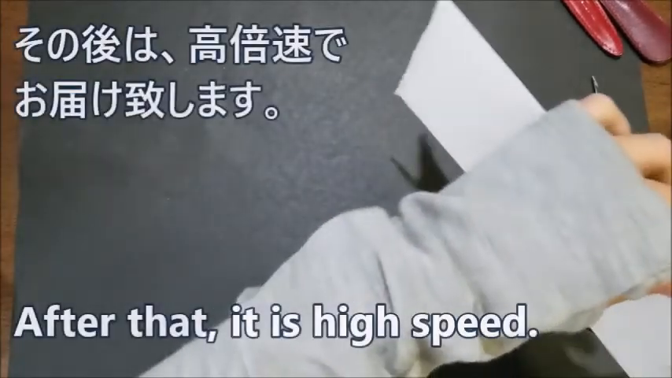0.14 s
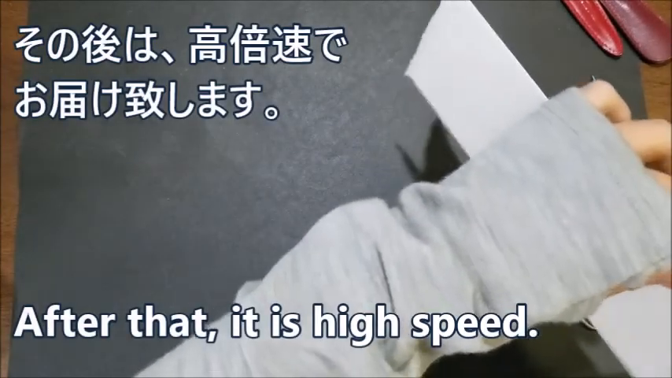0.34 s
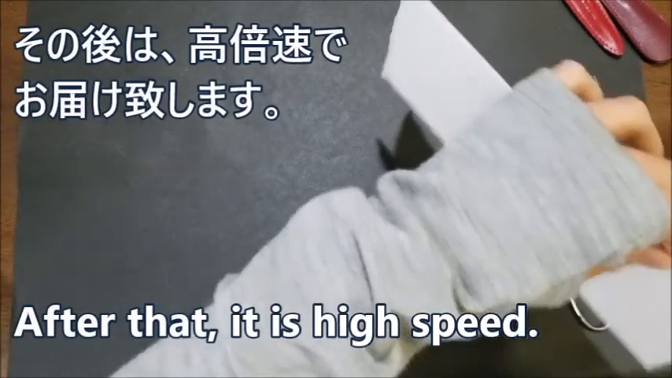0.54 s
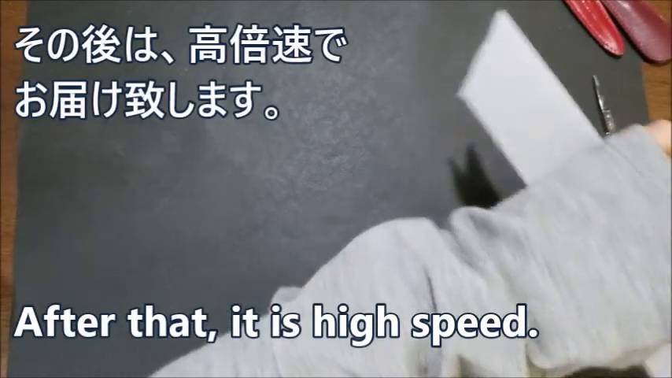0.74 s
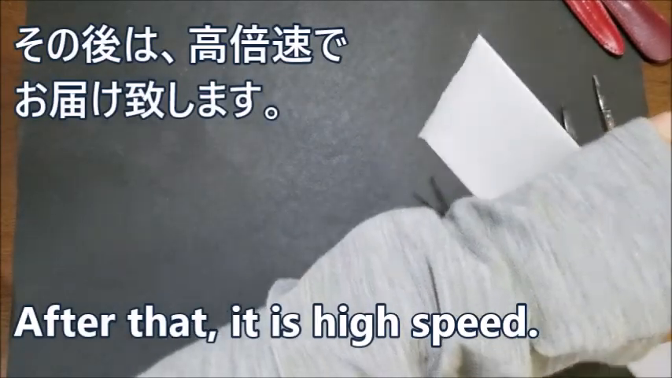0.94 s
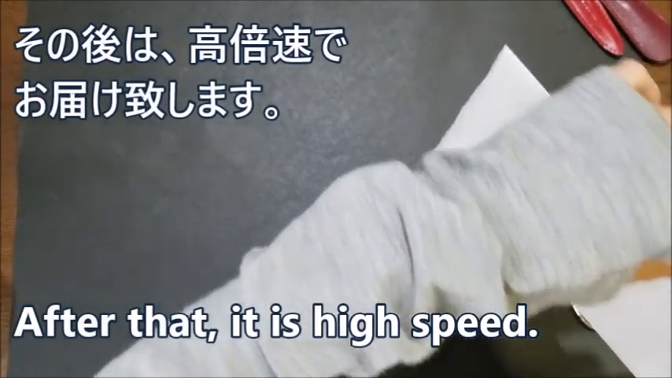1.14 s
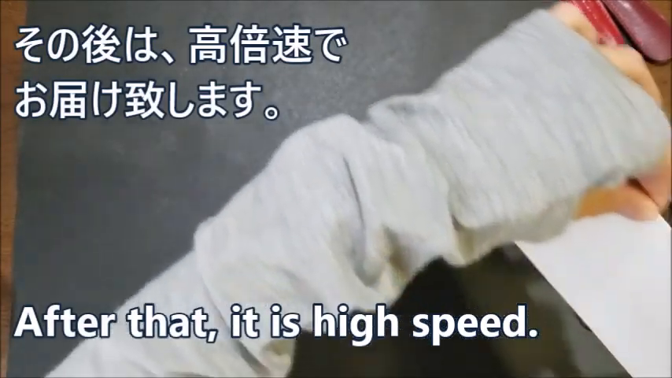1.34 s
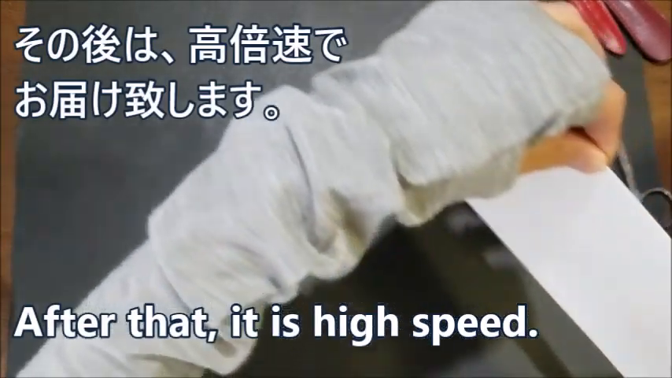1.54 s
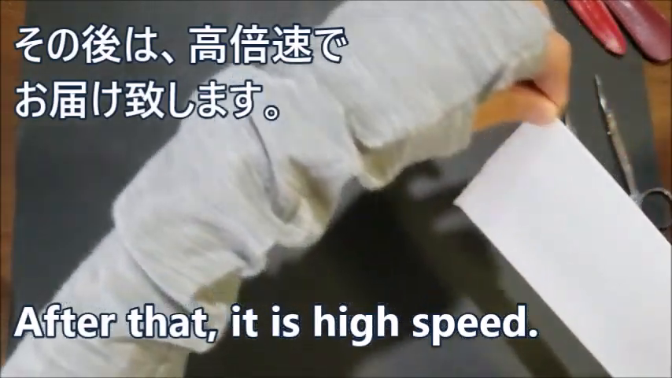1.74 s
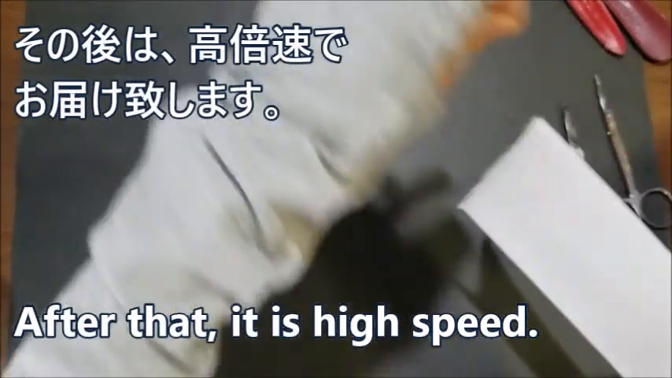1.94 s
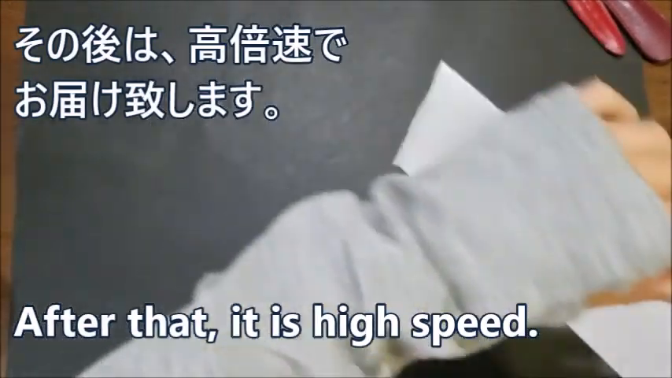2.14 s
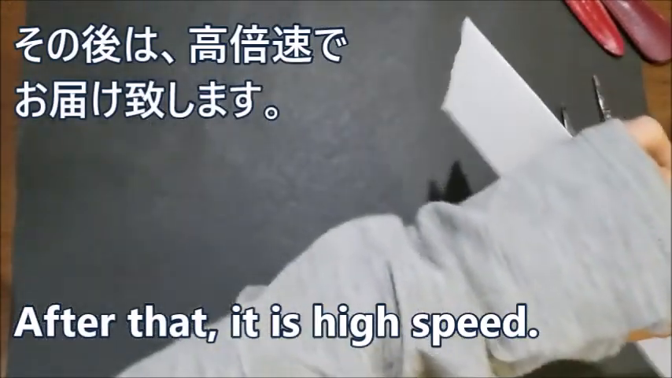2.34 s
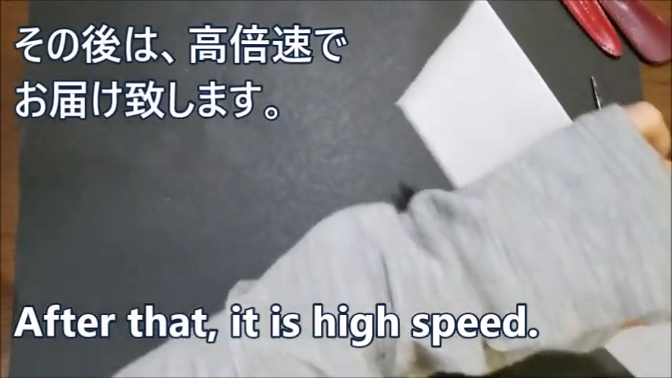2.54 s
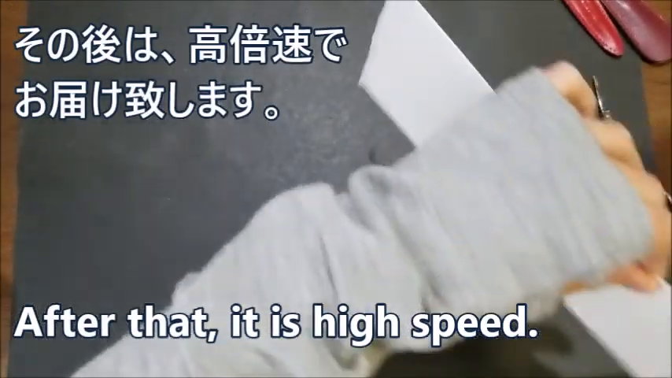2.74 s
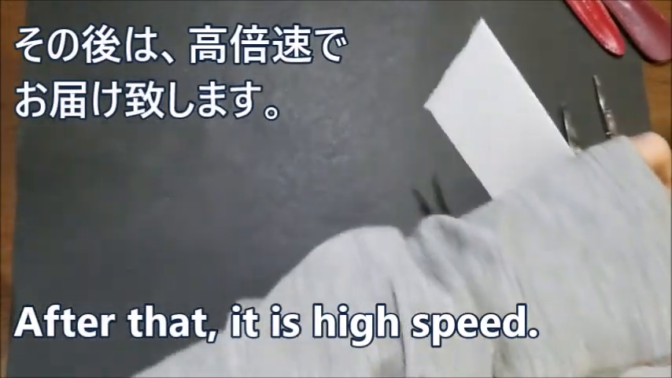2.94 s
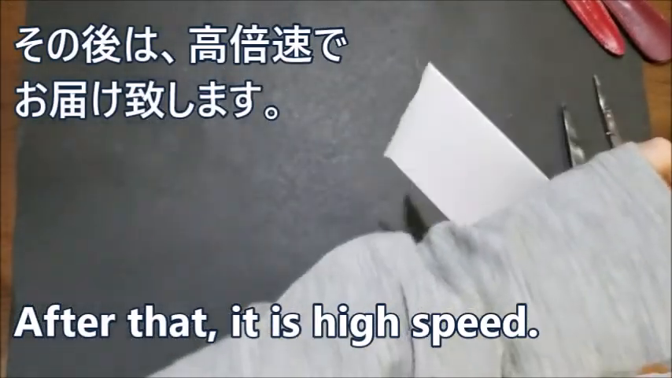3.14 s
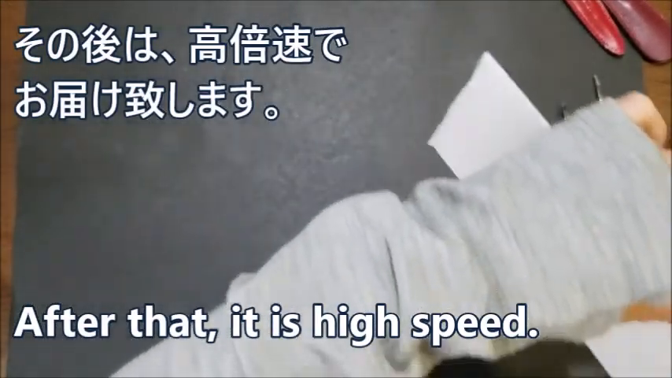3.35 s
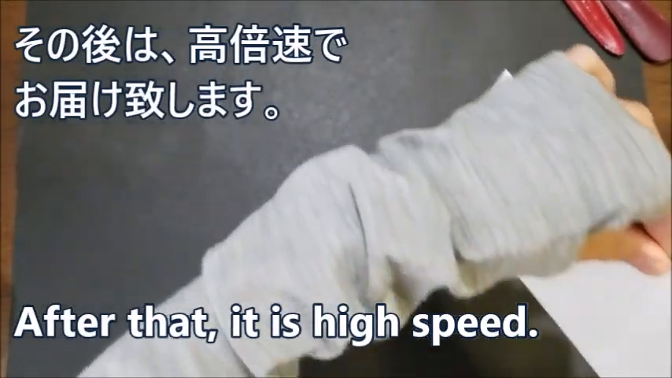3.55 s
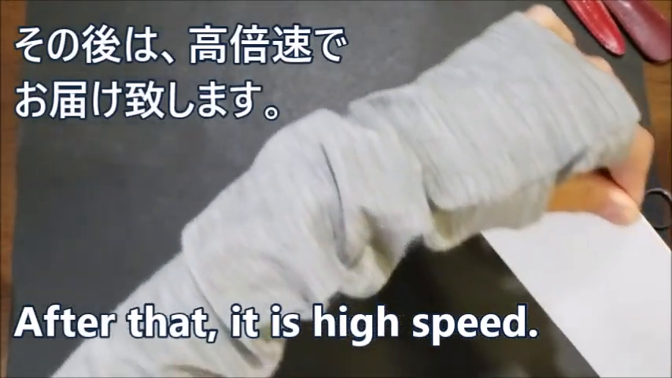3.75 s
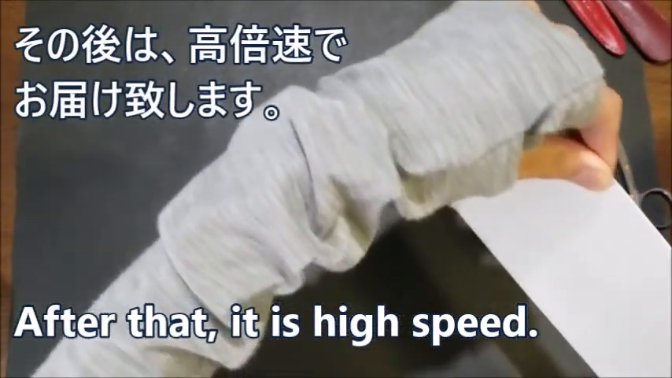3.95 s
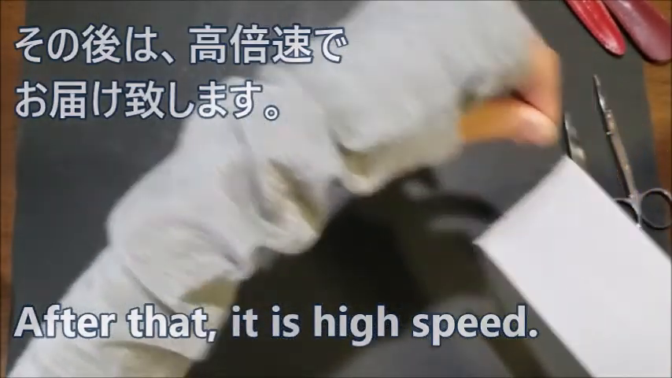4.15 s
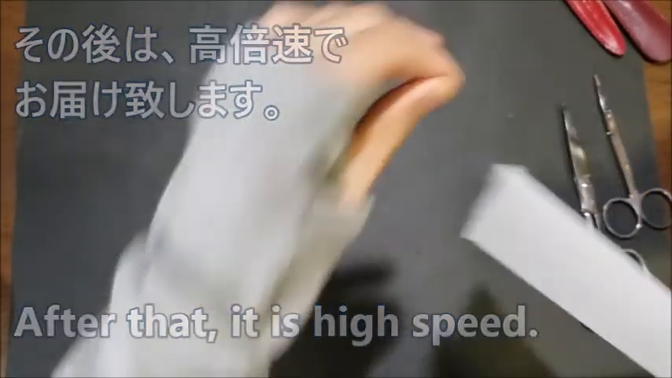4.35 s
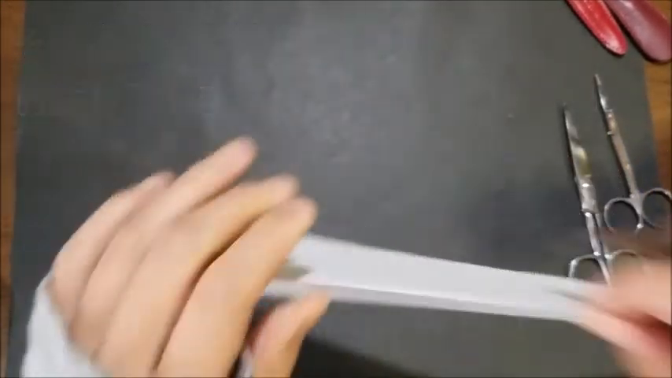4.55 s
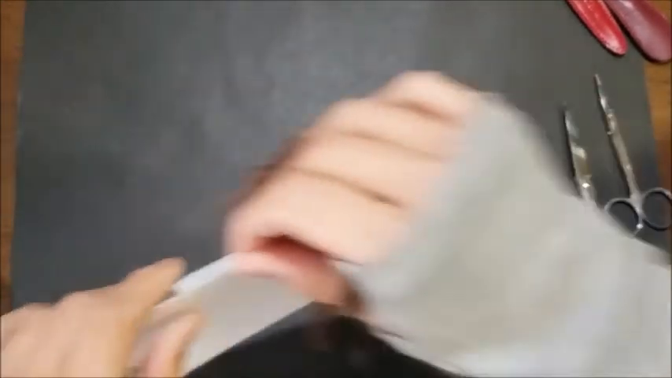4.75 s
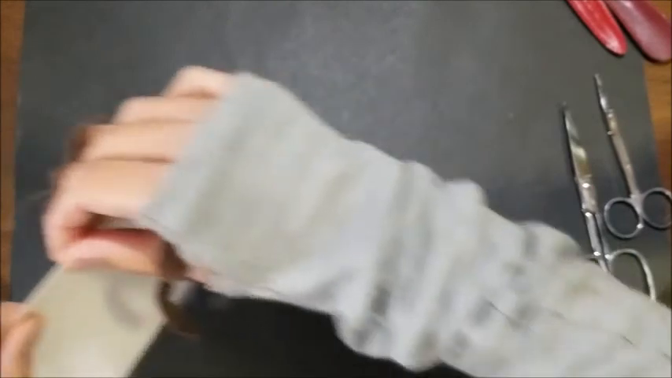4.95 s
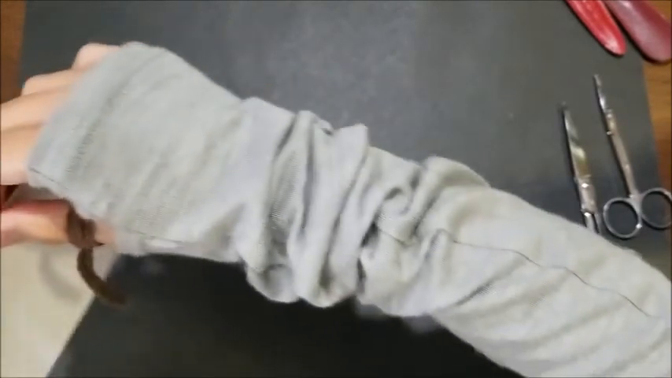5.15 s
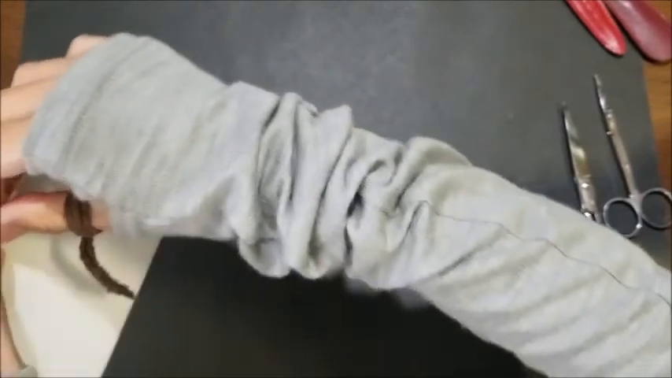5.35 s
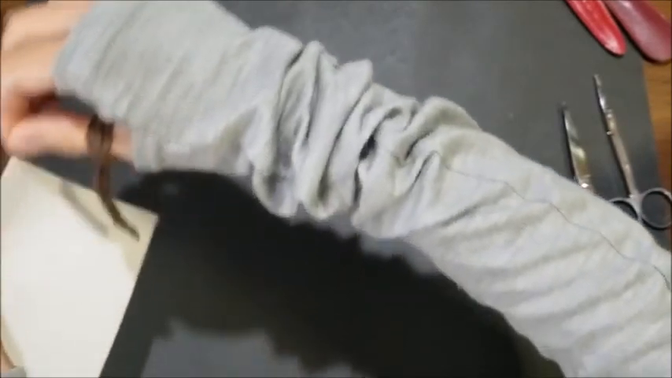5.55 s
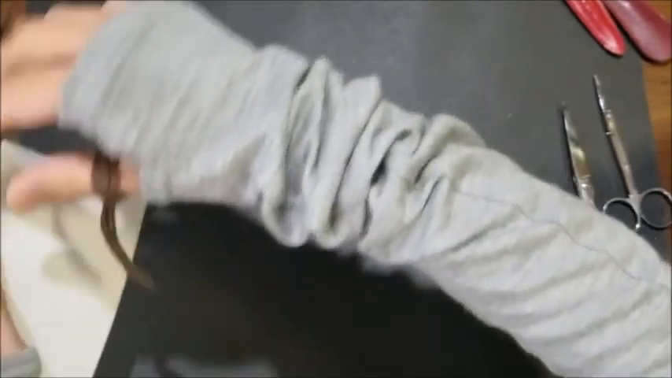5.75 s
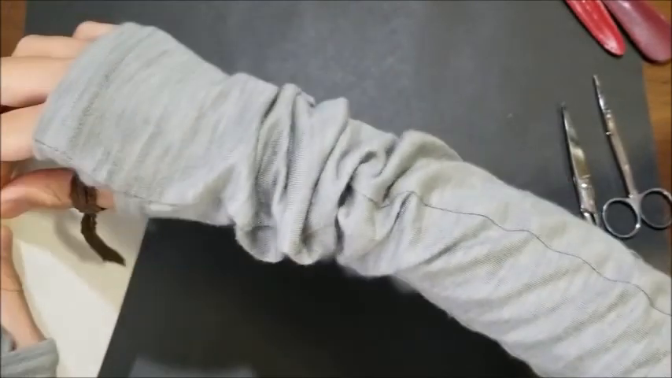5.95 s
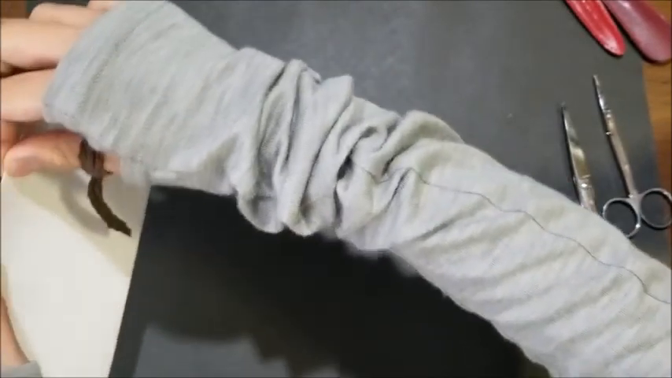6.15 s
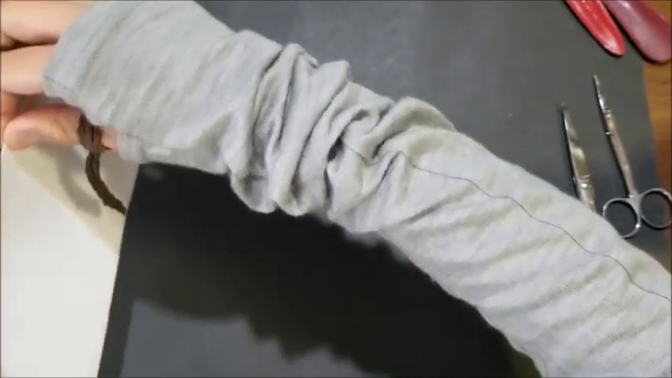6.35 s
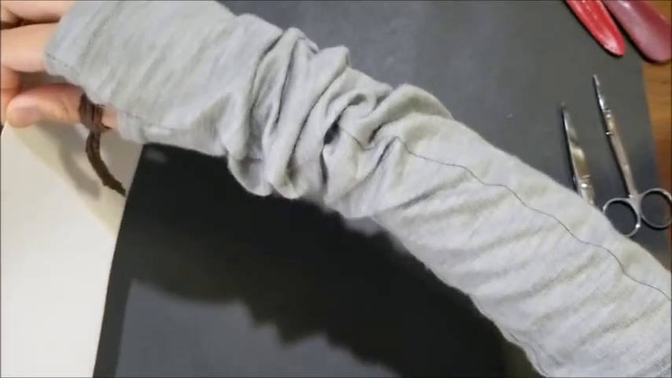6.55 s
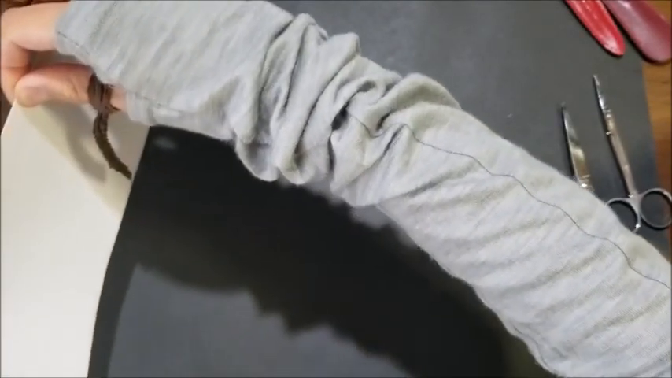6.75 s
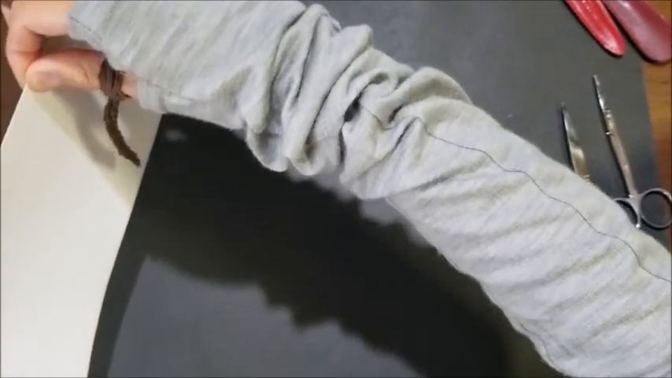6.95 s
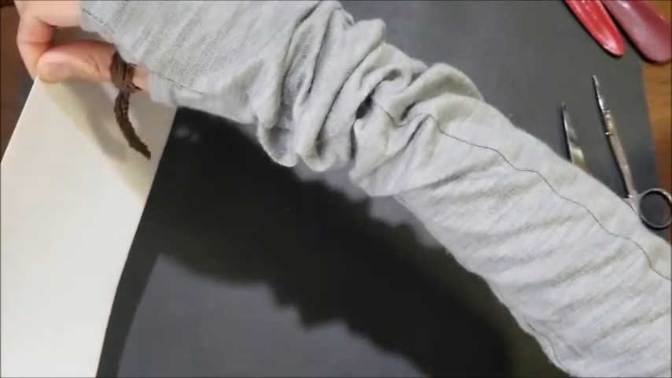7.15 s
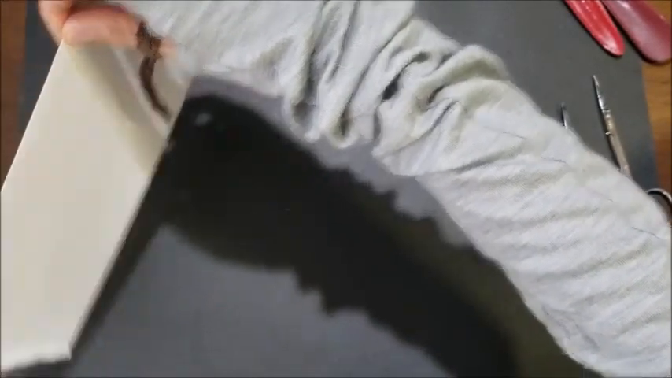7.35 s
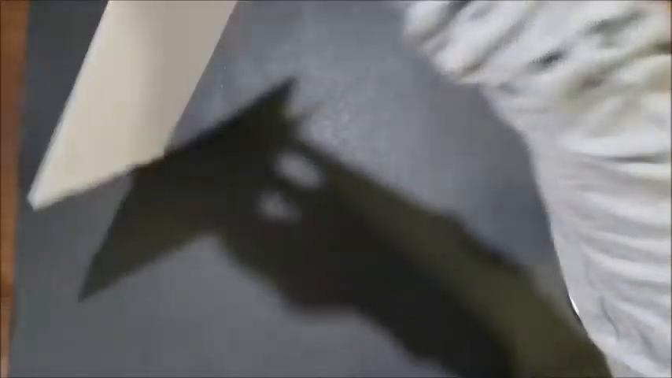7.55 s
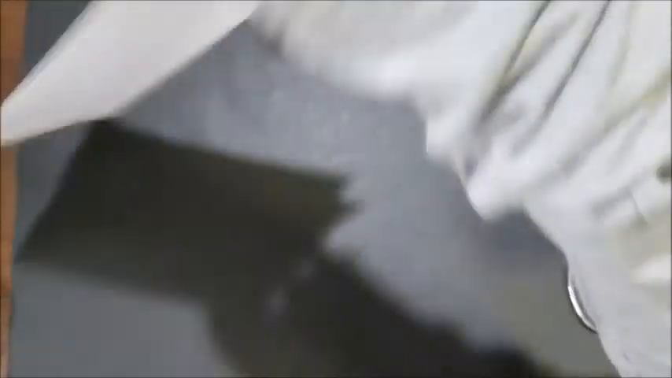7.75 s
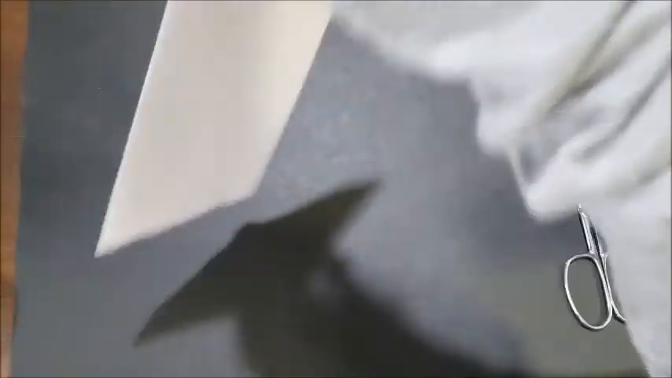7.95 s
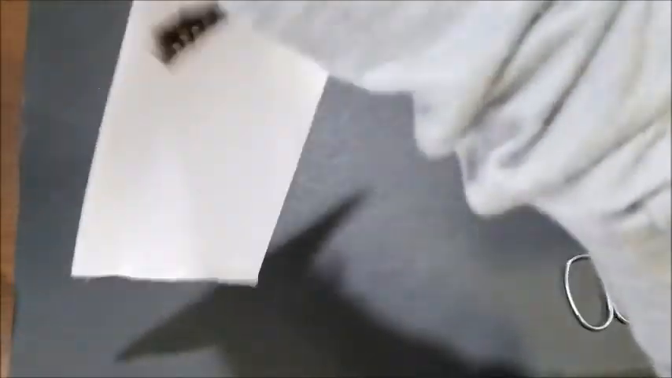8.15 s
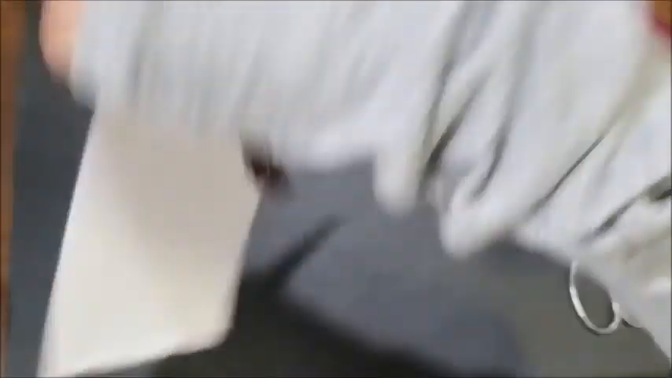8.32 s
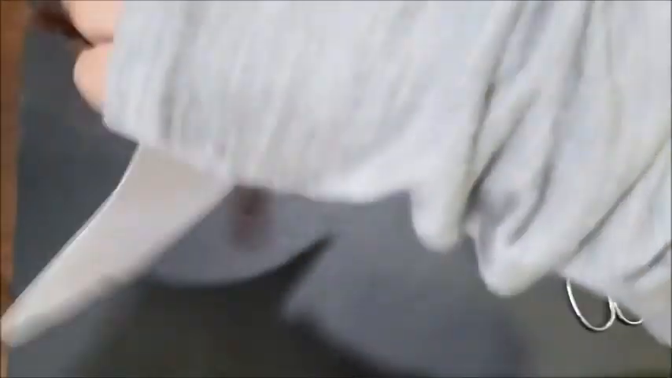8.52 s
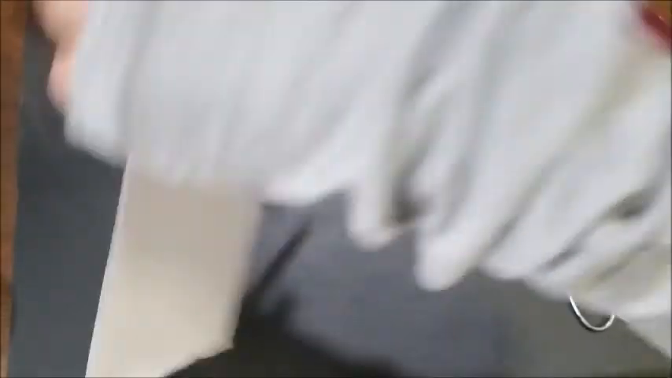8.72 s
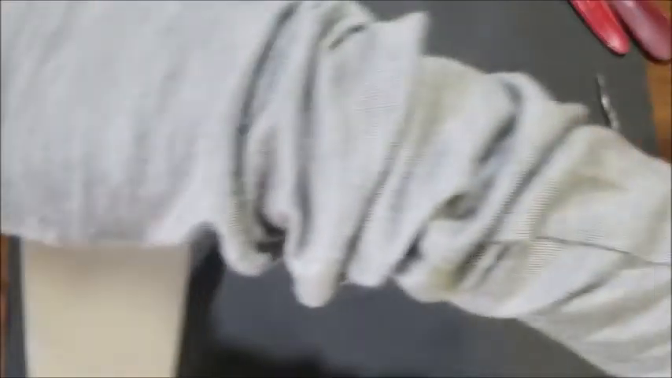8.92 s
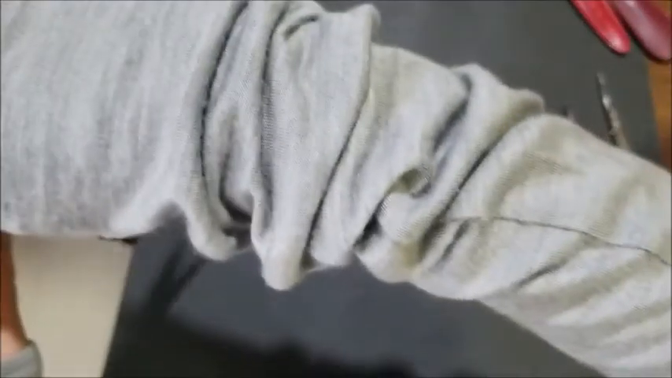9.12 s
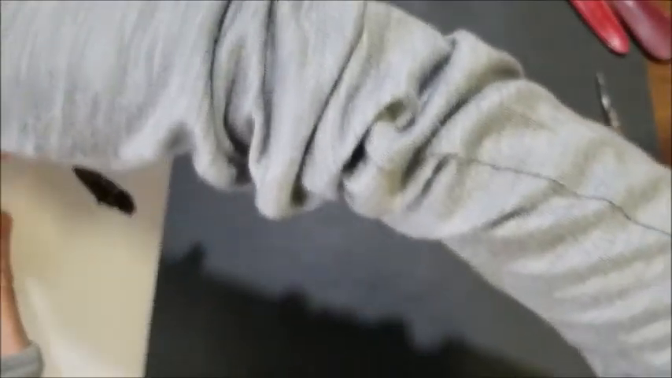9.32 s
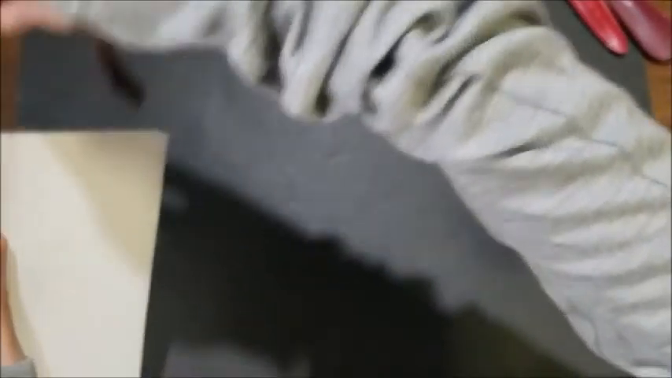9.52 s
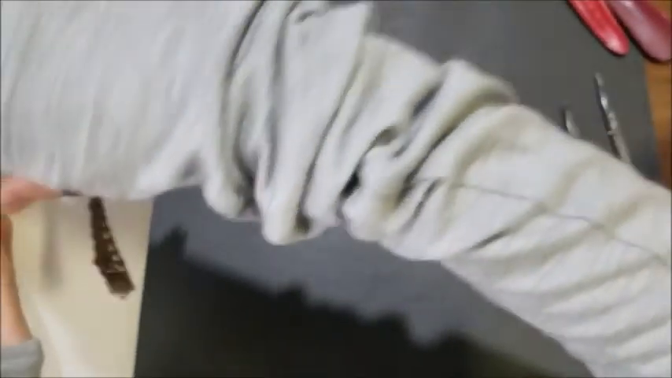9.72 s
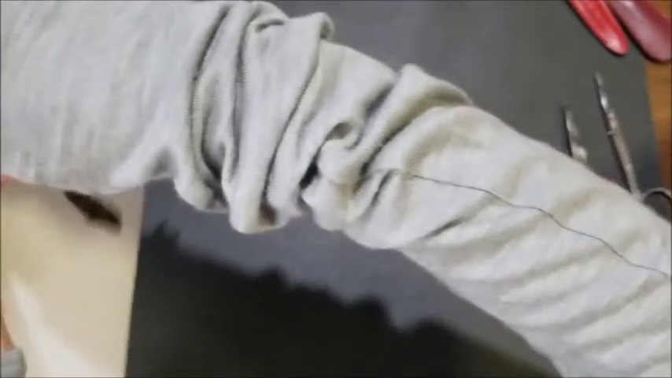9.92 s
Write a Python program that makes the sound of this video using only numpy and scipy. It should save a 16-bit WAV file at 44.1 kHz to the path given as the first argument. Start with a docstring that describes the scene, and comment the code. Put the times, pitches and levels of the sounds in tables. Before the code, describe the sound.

A quiet, dry room with faint steady hiss and a barely perceptible hum, heard closely in wide stereo with little bass. Light sleeve rustle leads to a quick paper swish on the right at 0.25-0.46 s. A long, uneven slide over the mat runs 1.0-1.8 s, ending in a rasping catch, chirp and soft thud. Short strokes come at 2.2 and 2.5 s, then brushing and another long glide from 3.2 to 4.16 s, again catching sharply. From 4.7 s light rustles shift left; a strong swish at 5.4 s precedes a softer, wavering slide at 6.0-7.3 s. At 7.8 s the sheet flaps with a thud and crack. Fluttering puffs and snaps follow at 8.3-8.7 s, with the crispest snap at 9.18 s. A short scrape ends in a pop at 9.47 s, then a brush and tiny final slide near 9.9 s.

```python
"""In a quiet room with faint hiss and hum, fingers and a cloth sleeve brush a sheet of paper: light friction.
It is slid over a desk mat, first on the right, then on the left: fibre slips hiss and shake edge, sheet and mat.
Each slide gathers speed, glides and stops; now and then the edge catches and rasps, or jerks free with a chirp.
The sheet flaps as puffs and sinking thuds, and late on it snaps as pulses with a short ring.
The whole sound is in stereo, with little bass and a deep gap around 4 kHz."""
import sys
import numpy as np
from scipy import signal
from scipy.fft import rfft, irfft, next_fast_len
from scipy.io import wavfile
from scipy.ndimage import map_coordinates

SR = 44100
rng = np.random.default_rng(int(sys.argv[2]) if len(sys.argv) > 2 else 0)


def transcribe(signal):
    """Save signal, clipped to [-1, 1], as a 16-bit WAV file at the path in sys.argv[1]."""
    frames = np.atleast_2d(signal).T
    limited = np.clip(frames, -1, 1)
    pcm = np.round(limited * 32767).astype(np.int16)
    wavfile.write(sys.argv[1], SR, pcm)


N = 440118

# Resonances of the paper edge. Each row: frequency in Hz, bandwidth in Hz, relative level in dB.
EDGE_MODES = [(5350, 700, -3), (6150, 900, 0), (6800, 800, -5)]


def from_db(db):
    """Decibels are logarithmic: 20 dB is a factor of ten in amplitude."""
    return 10 ** (np.asarray(db) / 20)


def rms_one(x):
    """Normalise the effective value (rms) of a signal to one."""
    return x / np.sqrt(np.mean(x ** 2) + 1e-20)


def colour(x, points):
    """Linear filtering: weight the spectrum by (Hz, dB) points joined along log frequency."""
    size = next_fast_len(x.shape[-1] + 4096)
    hz, db = np.transpose(points)
    bins = np.maximum(np.arange(size // 2 + 1) * SR / size, 1)
    gain = from_db(np.interp(np.log(bins), np.log(hz), db))
    return irfft(rfft(x, size) * gain, size)[..., :x.shape[-1]]


def band(x, low_hz, high_hz, order=2):
    """Band-pass filtering with the maximally flat Butterworth response."""
    edges = [low_hz, min(high_hz, .45 * SR)]
    return signal.sosfilt(signal.butter(order, edges, "band", fs=SR, output="sos"), x)


def resonate(x, modes):
    """Modal superposition: damped resonators in parallel, with alternating signs."""
    out = 0
    for k, (hz, width, db) in enumerate(modes):
        radius = np.exp(-np.pi * width / SR)
        zeros = np.array([1, 0, -1]) * (1 - radius * radius) / 2
        poles = [1, -2 * radius * np.cos(2 * np.pi * hz / SR), radius * radius]
        out = out + (-1) ** k * from_db(db) * signal.lfilter(zeros, poles, x)
    return out


def drift(size, rate):
    """Slow random modulation: normal values, `rate` of them a second, joined by lines."""
    knots = rng.standard_normal(int(size * rate / SR) + 2)
    return np.interp(np.arange(size) * rate / SR, np.arange(len(knots)), knots)


def sides(pan_db):
    """Intensity stereo: left and right gains for a level difference, at constant power."""
    gains = from_db(np.array([pan_db, -pan_db]) / 2)
    return gains / np.sqrt(np.mean(gains ** 2, axis=0))


def two_ears(size, on_left, alike, lag_s=0.000806):
    """Partial coherence: shared noise reaches the far microphone later, the rest is independent."""
    shared, own = rng.standard_normal(size), rng.standard_normal((2, size))
    share = min(abs(alike), 1)
    wander = 1 + .02 * drift(size, 3)  # the lag shifts as the hand moves
    far = map_coordinates(shared, [np.arange(size) - lag_s * SR * wander], order=3, mode="mirror")
    pair = np.array([shared, np.sign(alike) * far])  # negative alike: opposite phase
    near_first = pair[::1 if on_left else -1]
    return np.sqrt(share) * near_first + np.sqrt(1 - share) * own


def both_ports(x, pan_db, lag_s=.00075):
    """Dipole radiation: a flexing sheet reaches the far microphone later and in opposite phase."""
    return np.array([x, -np.roll(x, int(lag_s * SR))])[::1 if pan_db > 0 else -1]


def lay_out(sounds):
    """Superposition: sum (first sample, stereo sound) pairs on the time line."""
    out = np.zeros((2, N))
    for first, sound in sounds:
        out[:, first:first + sound.shape[1]] += sound[:, :N - first]
    return out


def quiet_room(air_db):
    """Stationary noise: steady air and microphone hiss, with a faint pure hum."""
    # Spectrum of the air and microphone hiss. Each row: frequency in Hz, relative level in dB.
    air_spectrum = [(25, -30), (55, -30), (80, -13), (120, -7), (200, -1.5), (350, -1.5), (700, 0),
                    (1200, -1.5), (2400, -4.5), (5000, -6.5), (9000, -8), (16000, -8.5)]
    hum_hz, hum_db = 119, -76
    hum = from_db(hum_db) * np.sin(2 * np.pi * hum_hz * np.arange(N) / SR)
    return from_db(air_db) * rms_one(colour(rng.standard_normal((2, N)), air_spectrum)) + hum


def touch(start, end, attack_s, release_s):
    """Contact envelope: linear attack, hold, exponential release; returned with its times."""
    first = max(int((start - attack_s / 2) * SR), 0)
    last = min(int((end + 6 * release_s) * SR), N)
    t = np.arange(first, last) / SR
    return t, np.clip((t - t[0]) / attack_s, 0, 1) * np.exp(-np.maximum(t - end, 0) / release_s)


def slips(size, per_s, spread_db, slip_s):
    """Stick-slip as a random point process: fibres catch and let go in dying bursts of force; rms 1."""
    strength = from_db(spread_db * np.clip(rng.standard_normal(size), -2, 2))
    releases = (rng.random(size) < per_s / SR) * strength
    return rms_one(signal.lfilter([1], [1, -np.exp(-1 / (slip_s * SR))], releases + 1e-9))


def desk_echo(x, delay_s, sway, strength):
    """Comb filtering: the contact moves, so its desk reflection changes delay and the colour sweeps."""
    n = np.arange(x.shape[1])
    delay = SR * delay_s * np.exp(sway * drift(len(n), 4.84))
    return x + strength * np.array([map_coordinates(side, [n - delay], order=3) for side in x])


def patches(x, patchy_db, per_s):
    """Changing modes: the sheet's free length varies under the hand, so treble bands swell and fade."""
    size = next_fast_len(x.shape[1])
    spectrum, hz = rfft(x, size), np.arange(size // 2 + 1) * SR / size
    centres = np.linspace(4000, 16000, 11)
    out = 0
    for share in np.eye(len(centres)):  # overlapping triangular bands
        part = irfft(spectrum * np.interp(hz, centres, share), size)[:, :x.shape[1]]
        out = out + part * from_db(patchy_db * drift(x.shape[1], per_s))
    return out


def friction(t, contact, hiss, rasp, body, rub, treble_pan, flutter_db, top_db, tilt_db):
    """Sliding friction: dense fibre slips hiss, and shake the edge, the sheet and the mat under it."""
    # Colour of the friction treble on either side of the desk.
    # Each row: frequency in Hz, relative level in dB.
    treble_left = [(2940, -11), (5000, 1.5), (5320, -1), (5650, -3.5), (6280, -6), (7060, -9.5),
                   (7580, -7.5), (7950, -8.5), (8820, -8), (9520, -7.5), (11200, -8.5), (14800, -17.5),
                   (15500, -21)]
    treble_right = [(2940, -15), (5000, -1), (5930, -4), (7730, -6.5), (8950, -3), (11400, -3.5),
                    (13100, -6), (13600, -2), (15500, -16)]
    # Broad resonances of the mat and of the sheet on it.
    # Each row: frequency in Hz, bandwidth in Hz, relative level in dB.
    mat_modes = [(262, 430, -4.5), (478, 197, 1), (715, 168, -2)]
    sheet_modes = [(875, 1090, -5.5), (1302, 440, 0.5), (2530, 1280, -2.5)]
    size, on_left = len(t), np.mean(treble_pan) > 0
    treble_pan = treble_pan + np.zeros(size)
    # sheet and mat sound further to the side than the hiss
    body_pan = 6.5 * np.tanh(treble_pan / 2) + 0.54 * treble_pan

    grain = slips(size, per_s=16000, spread_db=3, slip_s=.0008)
    grain = grain * from_db(flutter_db * drift(size, 69.3))
    scrape = two_ears(size, on_left, alike=.3, lag_s=0.001077)
    treble = colour(scrape * grain, treble_left if on_left else treble_right)
    treble = colour(treble, [(11300, 0), (13160, top_db)])  # shelf at the top of the hiss
    treble = desk_echo(treble, delay_s=.00033, sway=.06, strength=.36)
    treble = patches(treble, patchy_db=1.7, per_s=7)
    fibres = from_db(hiss) * rms_one(band(treble, 7010, .45 * SR, order=4))

    # where the rasp stands far above the hiss, the edge sticks and slips in separate jerks
    catching = np.clip((rasp - hiss - 2.5) / 7, 0, 1)
    edge_slips = slips(size, per_s=1600, spread_db=3, slip_s=.0012)
    edge_force = two_ears(size, on_left, alike=.6, lag_s=.001) * edge_slips
    edge = rms_one(band(resonate(edge_force, EDGE_MODES), 4600, 9000))
    glide = rms_one(band(treble, 3900, 7400, order=4))
    rasping = from_db(rasp) * (np.sqrt(catching) * edge + np.sqrt(1 - catching) * glide)

    # the sheet radiates from both faces, in opposite phase
    faces = two_ears(size, on_left, alike=-.5) * grain
    faces = desk_echo(faces, delay_s=.0021, sway=.12, strength=.35)
    pivot_hz = 1430  # the tilt in dB per octave runs an octave to either side
    faces = colour(faces, [(pivot_hz / 2, -tilt_db), (pivot_hz * 2, tilt_db)])
    sheet = from_db(body) * rms_one(band(resonate(faces, sheet_modes), 620, 5700))

    scuffs_db = 2.5 * drift(size, 45)  # uneven hand pressure makes the rub on the mat lumpy
    mat_force = two_ears(size, on_left, alike=-0.53, lag_s=0.00048) * grain
    mat = from_db(rub + scuffs_db) * rms_one(band(resonate(mat_force, mat_modes), 110, 1100))
    treble_part = (fibres + rasping) * sides(treble_pan)
    body_part = (sheet + mat) * sides(body_pan)
    return int(t[0] * SR), contact * (treble_part + body_part)


def brush(row):
    """Light friction: a touch that swells, then fades as the cloth runs off the paper."""
    start, length_s, attack_s, hiss, body, rub, pan_db = row
    fade_db, rasp_over_hiss_db = 2.5, 1
    t, contact = touch(start, start + length_s, attack_s, release_s=.0045)
    contact = contact * from_db(-fade_db * (t - start) / length_s)
    return friction(t, contact, hiss, hiss + rasp_over_hiss_db, body, rub, pan_db,
                    flutter_db=-0.5, top_db=1.5, tilt_db=-1.0)


def room(x):
    """Diffuse reverberation: a short, exponentially dying noise tail, different at each microphone."""
    t60_s, level_db = 0.15, -14.5
    t = np.arange(SR // 2) / SR
    tail = rng.standard_normal((2, len(t))) * from_db(-60 * t / t60_s) * (t > .004)
    tail = tail / np.sqrt(np.sum(tail ** 2) / 2)
    tail = colour(tail, [(200, -0.5), (1500, 0.0), (6000, -5.5), (15000, 1)])
    crossed = x + .5 * x[::-1]
    return from_db(level_db) * signal.fftconvolve(crossed, tail, axes=1)[:, :N]


def hand_motion(t):
    """Varying friction: swing of hiss, rasp and place about their medians; a short slide has none."""
    # Course of the three long slides, of which only the departures from the median count.
    # Each row: time in seconds, hiss level in dB, rasp level in dB, left-right difference in dB.
    long_pulls = [
        [(1.03, -47.5, -44.5, -10.5), (1.058, -44, -44.5, -8), (1.166, -42, -46, -8.5),
         (1.404, -43.5, -47.5, -4.5), (1.434, -42, -46, -5), (1.538, -43.5, -47.5, -5),
         (1.584, -45.5, -38.5, -5), (1.686, -45.5, -38.5, -11), (1.79, -39, -30.5, -9)],
        [(3.33, -44, -45.5, -6), (3.418, -39.5, -42.5, -7), (3.47, -46, -44.5, -4.5), (3.568, -44.5, -45, -6.0),
         (3.716, -42.5, -43, -2), (3.884, -44, -46, -6), (3.892, -44, -44.5, -3), (4.02, -45.5, -47.5, -7.0),
         (4.11, -44, -43, -10.5)],
        [(6.02, -48, -45.5, 6.5), (6.068, -43, -44, 5.5), (6.192, -48, -50.5, 5.5), (6.382, -46, -45, 5),
         (6.51, -50, -47, 2.5), (6.682, -45.5, -42, 3), (6.862, -49.5, -47, 1.5), (7.022, -45, -44, -0.5),
         (7.07, -46, -48, 1)],
    ]
    for pull in long_pulls:
        s, *columns = np.transpose(pull)
        if t[0] < s.mean() < t[-1]:
            courses = [np.interp(t, s, column) for column in columns]
            return [course - np.median(course) for course in courses]
    return 0, 0, 0


def edge_catch(t):
    """Stick-slip force: as the edge digs in, the added rasp (dB) starts quickly, then rises or falls."""
    # The edge digs in just before a slide stops.
    # Each row: start in seconds, end in seconds, added rasp in dB, further change in dB.
    catches = [(1.764, 1.806, 1, -3), (4.12, 4.166, 10, -3), (9.43, 9.47, 1, 3)]
    attack_s = 0.0034
    return sum(np.interp(t, [start, start + attack_s, end], [0, db, db + change_db])
               for start, end, db, change_db in catches if t[0] < start < t[-1])


def slide(row):
    """Speed-dependent friction: the sheet gathers speed, glides and stops; each layer follows in its share."""
    start, end, speed_up_s, slow_down_s, hiss, rasp, body, rub, pan_db, top_db, tilt_db = row
    start_drop_db, stop_drop_db = 18.5, 12  # softer by this much as it sets off and as it stops
    edge_follows, body_follows = 0.82, 0.39  # shares of the swing in dB
    catch_spreads = 0.27  # share of the added rasp that reaches the rest of the sheet
    t, contact = touch(start, end, attack_s=.008, release_s=.004)
    hiss_swing, rasp_swing, shift_db = hand_motion(t)
    setting_off = start_drop_db * np.exp(-np.maximum(t - start, 0) / speed_up_s)
    stopping = stop_drop_db * np.exp(-np.maximum(end - t, 0) / slow_down_s)
    speed_db, catch_db = -setting_off - stopping, edge_catch(t)
    shake_db = body_follows * (speed_db + hiss_swing) + catch_spreads * (catch_db + rasp_swing)
    hiss = hiss + speed_db + hiss_swing + catch_spreads * catch_db
    rasp = rasp + edge_follows * speed_db + rasp_swing + catch_db
    end_swell_db = 9 * np.exp(-np.abs(t - end) / 0.004)  # the low rub swells briefly around the end
    return friction(t, contact, hiss, rasp, body + shake_db, rub + shake_db + end_swell_db, pan_db + shift_db,
                    flutter_db=-0.58, top_db=top_db, tilt_db=tilt_db)


def flap(row, bands_db, thud_db, rise_s, ring_s, tail_db, tail_s, thud_s, sag):
    """Damped impact: a dull puff from the sheet, with a thud that sinks as the air cushion spreads."""
    # Edges of the three bands of the puff, in Hz.
    puff_edges = [130, 450, 1100, 3600]
    s, hz, level_db, bright_db, pan_db = row
    # 0.5 dB more upper band for each dB that a landing is harder than a typical one
    hardness_db = 0.5 * (level_db - -48)
    levels = [level_db, level_db + bright_db, level_db + bright_db + hardness_db]
    t = np.arange(SR // 5) / SR
    rise = -np.expm1(-t / rise_s)
    force = rise * (np.exp(-t / ring_s) + from_db(tail_db) * np.exp(-t / tail_s))
    puff = 0
    for k, (low, high) in enumerate(zip(puff_edges, puff_edges[1:])):
        part = band(two_ears(len(t), pan_db > 0, alike=-0.55) * force, low, high, order=3)
        puff = puff + from_db(levels[k] + bands_db[k]) * part / np.std(part, axis=1, keepdims=True)
    sinking_hz = hz * (1 + sag * (np.exp(-t / 0.01) - .35))
    phase = 2 * np.pi * np.cumsum(sinking_hz) / SR
    thud = from_db(max(levels[:2]) + thud_db) * rise * np.exp(-t / thud_s) * np.sin(phase)
    return int((s - rise_s) * SR), (puff + both_ports(thud, pan_db)) * sides(pan_db)[:, None]


def jerk(row, gain_db, scratch_db):
    """Forced resonance: a few milliseconds of hard friction scratch and ring the paper edge."""
    s, length_s, level_db, pan_db = row
    t = np.arange(SR // 20) / SR
    force = np.exp(-np.maximum(t - length_s, 0) / .0012)
    rub = two_ears(len(t), pan_db > 0, alike=0.59, lag_s=0.00082)
    scratch = from_db(scratch_db) * rms_one(band(rub, 4300, 18000))
    chirp = rms_one(resonate(rub, EDGE_MODES)) + scratch
    return int(s * SR), from_db(level_db + gain_db) * force * chirp * sides(pan_db)[:, None]


def snap(row, crack_s, ring_db, scatter_db, scatter_s):
    """Snap-through buckling: a push-pull pulse, a short ring of the panel, and flutter across the sheet."""
    s, level_db, hz, crack_db, ring_s, pan_db = row
    t = np.arange(-SR // 200, SR // 8) / SR
    after = np.maximum(t, 0)
    crack = from_db(crack_db) * t / crack_s * np.exp(-(t / crack_s) ** 2 / 2)
    ring = from_db(ring_db) * np.sin(2 * np.pi * hz * after) * np.exp(-after / ring_s)
    flutter = rms_one(band(two_ears(len(t), pan_db > 0, alike=-0.54), 226, 2200))
    flutter_envelope = np.exp(np.minimum(t, 0) / 0.0035 - after / scatter_s)
    flutter = from_db(scatter_db) * flutter * flutter_envelope
    buckle = both_ports(crack + ring, pan_db) + flutter
    return int((s + t[0]) * SR), from_db(level_db) * buckle * sides(pan_db)[:, None]


def scene():
    """Superposition of brushes, slides, flaps, jerks and snaps, with the room's response and its noise."""
    # Sleeve and fingers brush the sheet. Each row: start in seconds, length in seconds, attack in seconds,
    # fibre hiss in dB, sheet in dB, mat in dB, left-right difference in dB.
    brush_rows = [(0.067, 0.065, 0.029, -63, -61.5, -88, -7), (0.145, 0.19, 0.038, -69.5, -66, -82, -8),
                  (0.782, 0.039, 0.0074, -66, -61, -58, -6), (0.827, 0.18, 0.032, -76, -65.5, -66.5, -7),
                  (1.832, .05, 0.012, -75, -70, -68, 2), (2.366, 0.13, 0.011, -62.5, -58.5, -67, -9),
                  (2.777, 0.037, 0.006, -66, -60.5, -80, -4), (2.962, 0.033, 0.0057, -54, -50.5, -66, -2),
                  (3.029, 0.026, .009, -48.5, -50, -69, -7), (3.11, 0.011, 0.0077, -53, -47.5, -58, -7),
                  (3.125, 0.07, .008, -68, -65, -62.5, -6), (4.699, 0.058, .008, -53, -59, -73, 5),
                  (4.764, 0.11, 0.0092, -58.5, -58.5, -65, 7),
                  (4.888, 0.066, 0.028, -69.5, -63.5, -67.5, 9), (4.998, 0.052, 0.016, -56, -48.5, -71, 13),
                  (5.112, .15, 0.021, -53.5, -55.5, -64.5, 11), (5.27, 0.092, 0.018, -60.5, -56, -68, 9),
                  (5.855, .048, 0.0051, -55.5, -51, -58, 12), (7.339, 0.036, .005, -67, -65, -61, 4),
                  (7.73, 0.071, .01, -69, -64, -62, 0), (7.843, .04, 0.0062, -67, -69, -69, 0),
                  (8.069, 0.035, .015, -69, -70, -77, 4), (8.162, 0.027, .02, -53, -50.5, -58, 0.5),
                  (8.257, 0.078, 0.016, -58.5, -50, -68, 1), (8.366, .025, .007, -71, -56, -61, -0.5),
                  (8.404, .075, .01, -60, -51.5, -68, -0.5), (8.515, 0.046, .012, -61, -55.5, -58.5, 0.5),
                  (8.611, 0.038, 0.0074, -59, -51, -61.5, 0.5), (8.681, 0.055, 0.021, -67.5, -62.5, -67, 0),
                  (9.097, 0.13, 0.064, -61, -57.5, -59, 8), (9.777, 0.033, .011, -47, -44.5, -53.5, 11)]
    # The sheet slides; levels hold at full speed, before any swing. Each row: start in seconds, end in seconds,
    # time constants of speeding up and slowing down in seconds, fibre hiss in dB, edge rasp in dB, sheet in dB,
    # mat in dB, left-right difference of the hiss in dB, top of the hiss in dB, sheet tilt in dB per octave.
    slide_rows = [(0.255, 0.386, 0.063, 0.011, -33, -35, -36.5, -57, -10, -3, -3.5),
                  (0.381, 0.463, .006, 0.0011, -43, -40, -39.5, -59.5, -10, 0, -3),
                  (0.975, 1.805, 0.0088, .002, -39.5, -41, -47.5, -61.5, -7.5, 0, 0),
                  (2.155, 2.352, 0.011, 0.019, -48, -47, -50.5, -60, -6.5, 2, -2.5),
                  (2.47, 2.652, .035, 0.0056, -37.5, -34.5, -40, -54.5, -7, 2, -0.5),
                  (3.2, 4.163, 0.05, 0.0036, -41, -42, -48, -63, -6, 0.5, -1),
                  (5.374, 5.573, 0.018, .012, -32.5, -30.5, -35.5, -55, 9.5, -6, 0.5),
                  (6.001, 7.137, 0.0058, 0.047, -45, -41.5, -46, -54.5, 7.5, 0.5, 0.5),
                  (7.142, 7.334, 0.05, 0.003, -39, -43.5, -47, -55, 6.5, -1, 2),
                  (9.23, 9.467, 0.0034, 0.0014, -43, -41.5, -44.5, -63, 8, 2.5, -2),
                  (9.924, 9.988, 0.0016, .002, -43, -43, -45, -63, 10.5, 2, 4)]
    # Sheet and hand land on the mat. Each row: time in seconds, nominal thud pitch in Hz,
    # level in dB before the band offsets, brightness in dB, left-right difference in dB.
    flap_rows = [(0.82, 420, -45, -2, -19), (0.843, 550, -49.5, 4.5, -13), (0.868, 543, -50.5, 3, -16),
                 (0.929, 258, -57, -18, -24), (1.817, 303, -46.5, -4, -18), (1.836, 298.7, -47, -10, -24),
                 (2.249, 336, -54.5, 3, -11), (2.337, 242, -56, -6, -19), (2.382, 570, -55, 1, -17),
                 (2.489, 870, -62, 13.5, -10), (2.972, 420, -52.5, 10.5, -14), (2.983, 483, -51, -13, -15),
                 (3.048, 252, -50, -2, -16), (3.149, 397, -57, -20, -16), (3.897, 724, -49, -2, -15),
                 (3.967, 382, -48, 1, -16), (4.114, 251, -49, -11, -14), (4.186, 470, -49, -5.5, -18.5),
                 (4.2, 468, -51.5, -6, -18), (5.284, 248, -53, -8, 24), (5.325, 232, -57, -5, 25),
                 (7.429, 212, -47, -13, 34), (7.461, 240, -50, -21, 26), (7.734, 335, -62.5, 8, 9),
                 (7.756, 700, -55, -2, 7), (7.774, 357, -54.5, 5.5, 7), (7.806, 244, -30.5, -1.5, 17),
                 (7.812, 384, -41, 5.5, 21), (7.835, 330, -55, 2, 7), (8.254, 497, -48.5, 2, 10),
                 (8.261, 220, -44, 5.5, 15), (8.319, 215, -52, 1, 12), (8.51, 514, -55, -2, 27),
                 (8.542, 484, -55, 3.5, 19), (8.586, 787, -57.5, 4, 6), (8.754, 467, -58, 0.5, 10),
                 (9.096, 373, -49, -2, 19), (9.144, 362, -52.5, -13, 18), (9.179, 236, -43.5, 10, 17),
                 (9.187, 410, -46.5, 3, 19), (9.469, 434, -44.5, -10, 24), (9.927, 410, -52.5, -2, 14)]
    # The paper edge jerks free with a short chirp. Each row: time in seconds, length in seconds,
    # level in dB before the common gain, left-right difference in dB.
    jerk_rows = [(1.797, 0.0048, -30.5, -10), (4.121, 0.0058, -35, -15), (7.8057, 0.0036, -29, 3),
                 (8.304, 0.0036, -50, 4), (8.317, .004, -58, 6), (9.169, 0.002, -47.5, 4),
                 (9.454, 0.0061, -33, 5)]
    # The sheet buckles. Each row: time in seconds, level in dB, ring pitch in Hz,
    # crack in dB against that level, ring decay constant in seconds, left-right difference in dB.
    snap_rows = [(7.688, -58.5, 2010, 16, .003, -20), (7.802, -33, 1370, 11, .004, -15),
                 (8.308, -35, 872, 20, 0.0075, 7), (8.3545, -37.5, 1350, 8, 0.0051, 18),
                 (8.5118, -50, 1720, 14, .003, 1), (8.6188, -62, 1800, 16, .003, 5),
                 (8.7185, -49, 1020, -1, 0.0038, 14), (9.1843, -26, 1150, 20, 0.0015, 12),
                 (9.4686, -28.5, 595, 20, 0.002, 7.5)]
    slides = lay_out(slide(row) for row in slide_rows)
    brushes = lay_out(brush(row) for row in brush_rows)
    flaps = lay_out(flap(row, bands_db=[-13.5, -14, -23.5], thud_db=1, rise_s=0.000995, ring_s=0.0043,
                         tail_db=-10.5, tail_s=0.022, thud_s=0.011, sag=0.305) for row in flap_rows)
    snaps = lay_out(snap(row, crack_s=0.0001, ring_db=2, scatter_db=-6, scatter_s=0.0078)
                    for row in snap_rows)
    jerks = lay_out(jerk(row, gain_db=1.0, scratch_db=-2.5) for row in jerk_rows)
    paper = slides + brushes + flaps + snaps + jerks
    return paper + room(paper) + quiet_room(air_db=-64.0)


def record(dry):
    """Linear filtering: little bass and a deep gap around 4 kHz are left, and the top ends steeply."""
    # Colour of the whole sound in the bass and around 4 kHz. Each row: frequency in Hz, gain in dB.
    bass_points = [(25, -15), (55, -4), (100, -18.5), (135, -11.5), (180, 0), (300, 0), (450, 0)]
    gap_points = [(2480, 0), (2800, -10.5), (3000, -22.5), (3300, -22.5), (3680, -31), (3800, -53),
                  (4330, -49.5), (4430, -29), (4680, -6), (5000, -1)]
    cutoff_hz = 15800
    shaped = colour(dry, bass_points + gap_points)
    return signal.sosfilt(signal.ellip(12, .1, 80, cutoff_hz, fs=SR, output="sos"), shaped)


dry = scene()
out = record(dry)
transcribe(out)
```